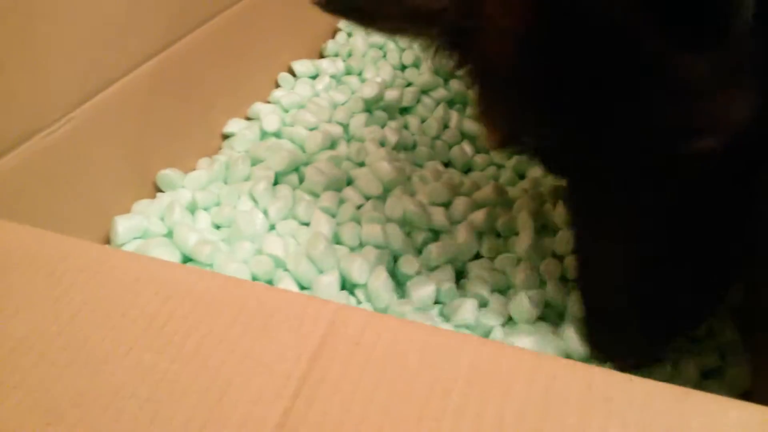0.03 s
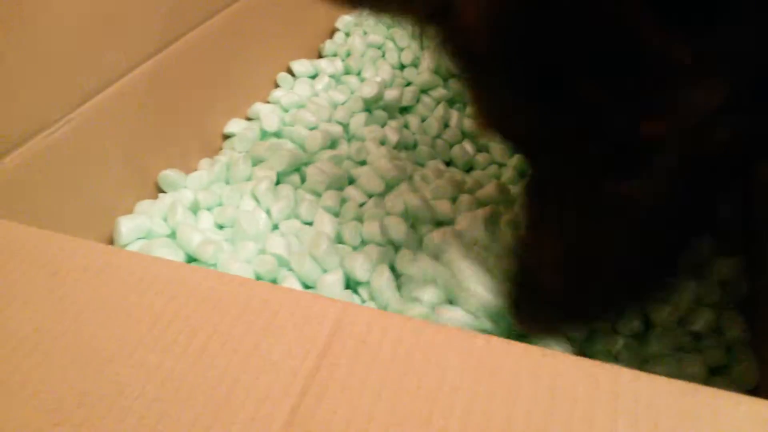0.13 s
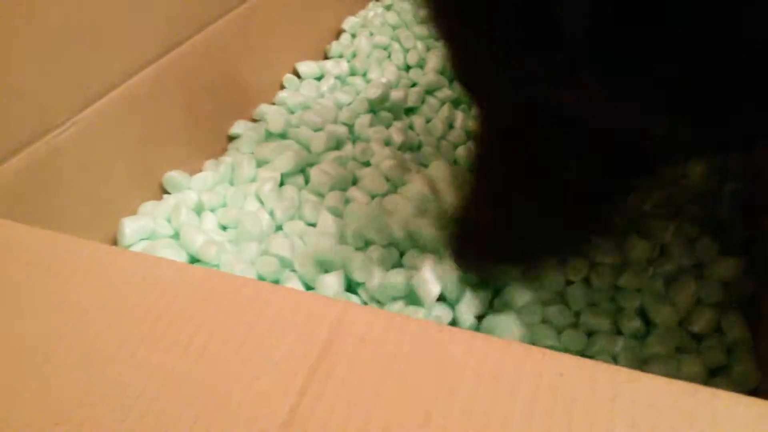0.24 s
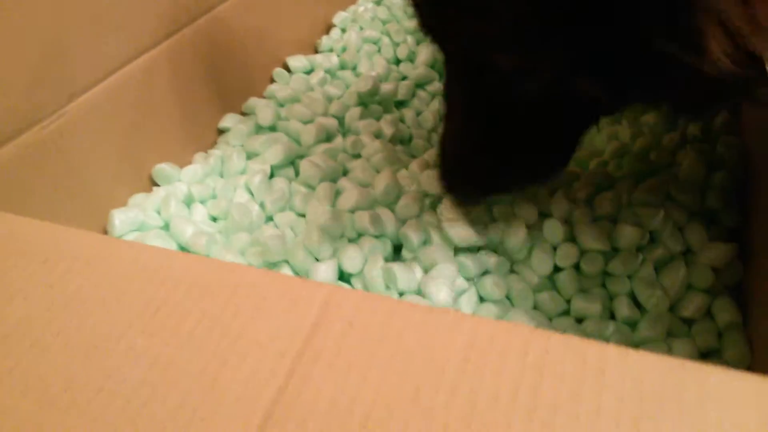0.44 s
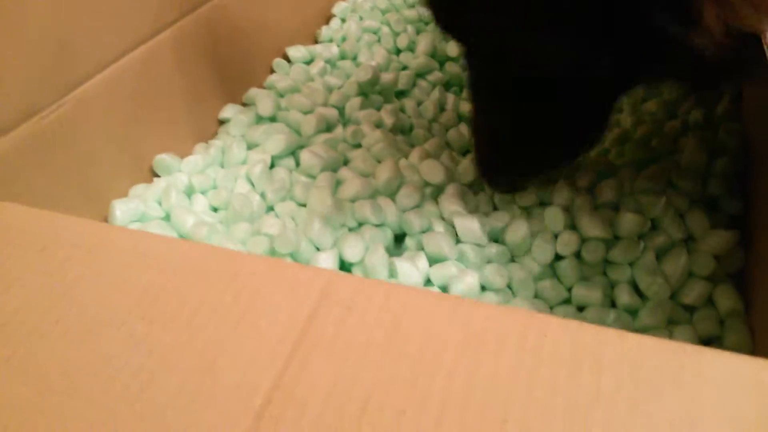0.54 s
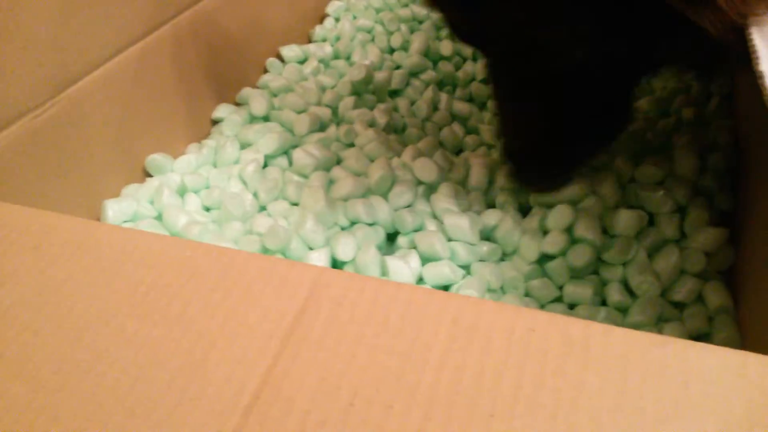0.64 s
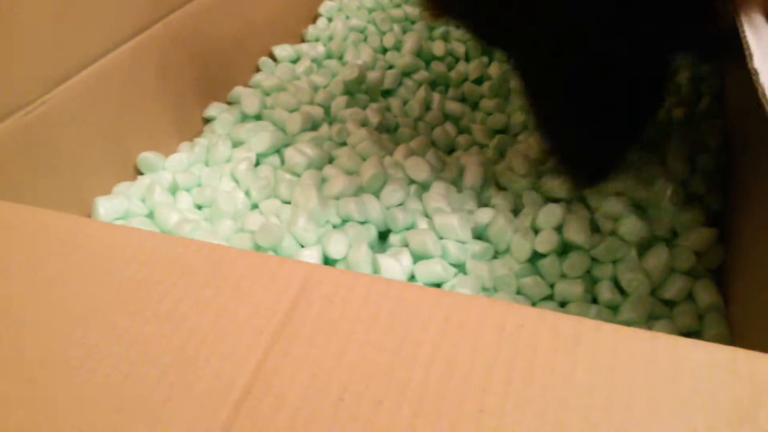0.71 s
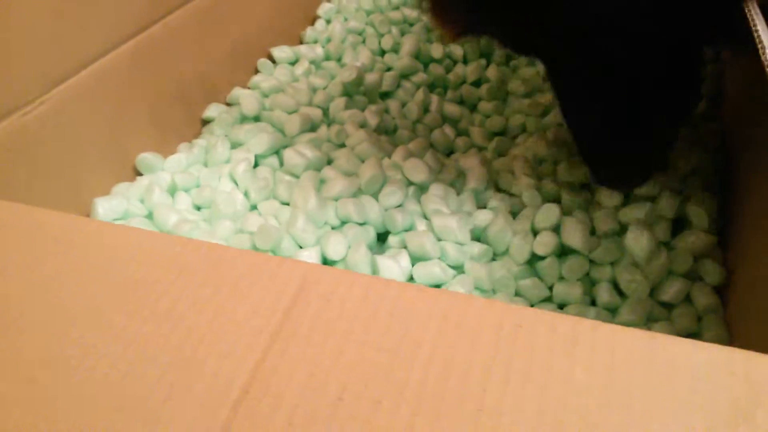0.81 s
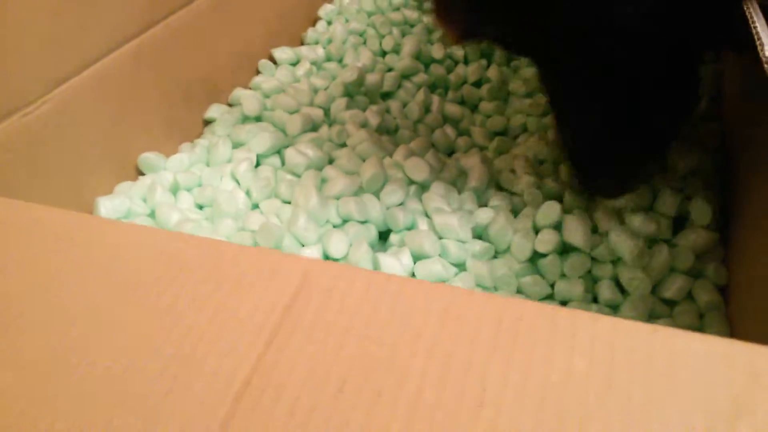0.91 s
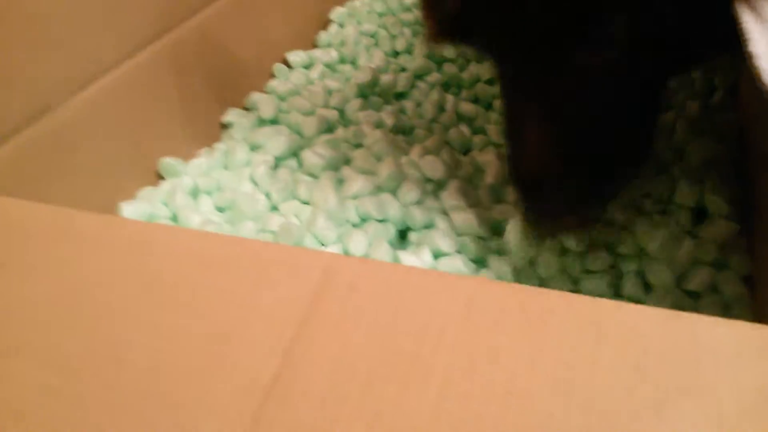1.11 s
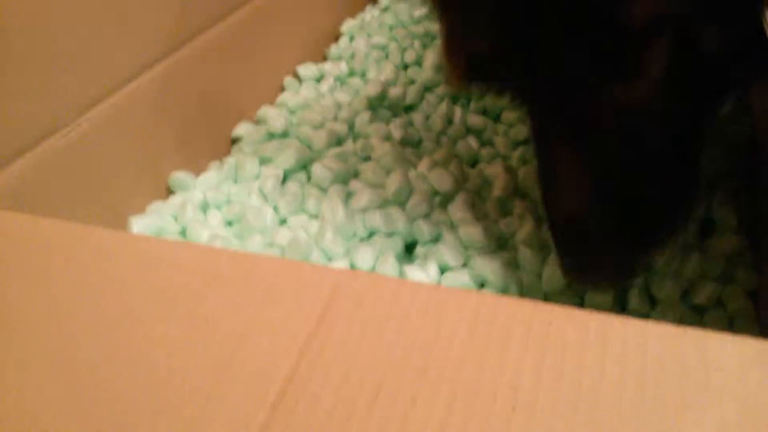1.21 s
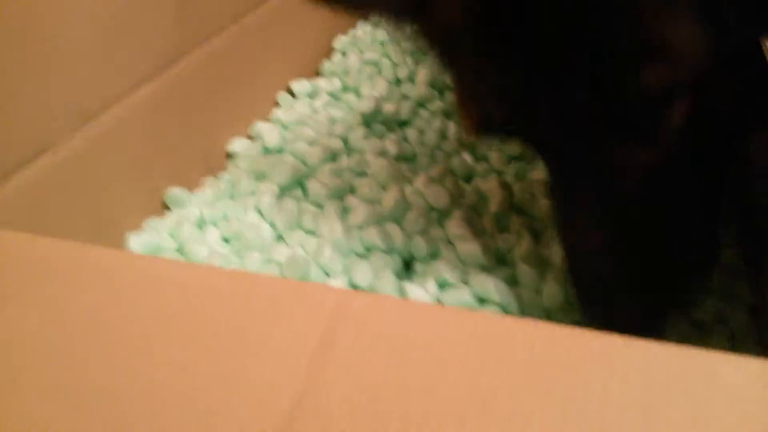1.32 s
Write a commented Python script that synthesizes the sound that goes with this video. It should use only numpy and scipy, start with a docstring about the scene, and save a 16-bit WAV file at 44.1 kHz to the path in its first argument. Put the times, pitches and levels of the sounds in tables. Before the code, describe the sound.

Packing peanuts rub and crackle lightly under a dog's nose, heard close to a big cardboard box in a small room. A quick cluster of knocks leaves a low boom, then come faint thin squeaks and one more bump.

```python
"""Dog in a box of packing peanuts

One microphone in a small room, on a big cardboard box. A dog pushes its muzzle through the
foam peanuts inside: they rub, tick and squeak thinly. A few dry knocks ring the cardboard,
and low room resonances swell and boom softly, mostly just after the knocks."""
import sys
import numpy as np
from scipy import signal
from scipy.fft import rfft, irfft
from scipy.io import wavfile

SR = 44100
rng = np.random.default_rng(int(sys.argv[2]) if len(sys.argv) > 2 else 0)


def wav_out(sig):
    """Save sig, one row per channel (or a flat mono array), as 16-bit PCM at SR to the path in sys.argv[1]."""
    wavfile.write(sys.argv[1], SR, np.round(np.clip(np.atleast_2d(sig).T, -1, 1) * 32767).astype(np.int16))


N = 59535
T = np.arange(N) / SR

# Room tone. Each row: frequency in Hz, relative level in dB.
AIR_SPECTRUM = [(15, -37), (25, -8), (59, 2), (194, 2), (388, -14.5), (1010, -8), (1680, -12.5),
                (5000, -23), (13000, -25.5), (14500, -28)]
# Low room resonances swelling. Each row: start in seconds, deepest mode's level in dB,
# upper modes' level in dB, their pitch ratio, their ring time (t60) in seconds.
LOW_BOOMS = [(0.272, -38, -64, 0.85, .4), (0.396, -22.5, -35, 0.98, 0.88), (.56, -28, -40, 0.61, 0.23),
             (.75, -36, -43, 0.93, 0.29), (1.17, -47, -35, .88, .25), (1.262, -57, -37.5, 0.88, 0.19)]
# Those upper modes. Each row: frequency in Hz, relative level in dB, share of the ring time.
ROOM_MODES = [(124.8, -9.5, 1), (198.1, 3, 0.93), (297.7, -3, 0.6), (373, -19, 0.45)]
# The whole load shifting. Each row: time in seconds, level in dB.
SHUFFLE_LEVELS = [(0, -68), (.07, -57), (.11, -43.5), (.15, -54.5), (.21, -45), (.3, -46), (.37, -38.5),
                  (.41, -35), (.47, -45.5), (.56, -49.5), (.7, -48), (.79, -47), (.95, -53), (1.1, -55.5),
                  (1.165, -45.5), (1.23, -51.5), (1.35, -59)]
# Its dull colour. Each row: frequency in Hz, relative level in dB.
SHUFFLE_SPECTRUM = [(25, -28), (38, -8), (55, 0.5), (78, -0.5), (100, -6), (135, -3.5), (250, -8),
                    (450, -8.5), (750, -12), (1200, -24), (3000, -47)]
# Knocks on the cardboard and the short room echoes after the loudest ones. Each row: start in
# seconds, level in dB, relative level of the scuff in dB, scuff decay in seconds, pitch ratio.
KNOCKS_AND_ECHOES = [(0.207, -36, -4, 0.0065, 1.1), (0.217, -30.5, -3.5, 0.0093, 1.05),
                     (0.232, -33, -18, 0.0052, 1), (.2445, -28, 0, 0.022, 1.05),
                     (0.2909, -25, 2.5, 0.0087, 1.01), (0.3243, -25.5, -4, .006, 0.98),
                     (0.3294, -30.5, 7.5, 0.018, 0.915), (0.365, -8.5, -5, 0.012, 1.05),
                     (0.3857, -31, 3.5, 0.016, 1.08), (0.427, -25.5, 1.5, 0.0053, 0.97),
                     (.938, -51.5, 8.5, 0.0055, 0.92), (1.011, -41, -6, 0.0084, 1.3),
                     (1.135, -21.5, -9.5, 0.0068, 0.86), (1.188, -39, 0.5, 0.015, 1.03),
                     (1.276, -46.5, 2.5, 0.0057, 0.97)]
# The cardboard's brief ring. Each row: frequency in Hz, relative level in dB, t60 in seconds.
CARDBOARD_MODES = [(920, -15.5, 0.014), (1145, -5.5, 0.0094), (1340, -8.5, 0.011), (1480, -9, 0.0071),
                   (1983, -4, 0.0083), (2425, -8, 0.0075), (2740, -12, 0.007)]
# Muzzle scraping cardboard. Each row: frequency in Hz, relative level in dB.
SCUFF_SPECTRUM = [(200, -28), (500, -14), (800, -4.5), (1200, 2.5), (1600, -5.5), (2050, -1), (2600, -10),
                  (3300, -20.5), (6000, -31), (12000, -54)]
# Reflections between the box walls. Each row: delay in seconds, gain in dB.
BOX_ECHOES = [(.0026, -8.5), (.0041, -14.5), (.0062, -15.5), (.0088, -15)]
# Foam squeaks. Each row: middle in seconds, half length in seconds, level in dB, pitch in Hz.
SQUEAKS = [(0.703, 0.016, -48, 13370), (0.868, 0.02, -50.5, 13460), (0.889, 0.0025, -49, 4550)]
# Single peanuts snapping. Each row: start in seconds, level in dB.
TICKS = [(0.207, -42), (.269, -32.5), (0.696, -33), (0.758, -48), (.764, -46), (.78, -44), (.822, -51),
         (0.8694, -29), (1.015, -50)]
# How hard the muzzle stirs the peanuts. Each row: time in seconds, level in dB.
STIR_LEVELS = [(0, -52), (.164, -51), (.184, -45.5), (.22, -40), (.23, -47.5), (.33, -46), (.39, -47),
               (.43, -53), (.55, -57.5), (.65, -53), (.698, -43.5), (.718, -49), (.756, -44), (.795, -50.5),
               (.82, -48.5), (.835, -53.5), (.855, -56), (.88, -51), (.906, -62), (1.05, -61.5),
               (1.12, -52), (1.18, -60.5), (1.35, -58.5)]
# Foam rubbing on foam. Each row: frequency in Hz, relative level in dB.
RUSTLE_SPECTRUM = [(150, -15), (300, -29), (450, -12), (750, -11), (1400, -7), (2100, -5), (3000, -6),
                   (4000, -1.5), (4700, -0.5), (6300, -6.5), (9000, -10), (14000, -15.5)]

AIR_DB, SHUFFLE_DB, SCUFF_DB = -53.5, -3.5, 15.5
BOOM_HZ, BOOM_T60_S, BOOM_RISE_S = 56.6, 0.32, 0.03
CONTACT_HZ = 3640  # a soft contact dulls the blow
CRUNCH_DB, CRUNCH_DELAY_S, CRUNCH_DECAY_S = -22, 0.0034, 0.0044
RUB_DB, JERK_DB = -2, 1.0
SLIP_DB, SLIP_SPREAD_DB, SLIPS_PER_S = -3, 2, 2200  # the rate holds at the rms stirring level
ROOM_T60_S, ROOM_DELAY_S, KNOCK_ROOM_DB, FOAM_ROOM_DB = 0.35, 0.015, -7, -12
LOW_CUT_HZ, HIGH_CUT_HZ = 26, 14600


def from_db(db):
    """Decibels to gain."""
    return 10 ** (np.asarray(db) / 20)


def unit_rms(x):
    """Scale to an rms of 1."""
    return x / np.sqrt(np.mean(x ** 2) + 1e-20)


def level(rows):
    """Gain over time from (seconds, dB) points."""
    return from_db(np.interp(T, *np.transpose(rows)))


def noise():
    """White noise for the length of the scene."""
    return rng.standard_normal(N)


def coloured(x, spectrum):
    """Filter by a curve of (Hz, dB) points, then scale to an rms of 1."""
    hz, db = np.transpose(spectrum)
    bin_hz = np.maximum(np.arange(N // 2 + 1) * SR / N, 1)
    gain = from_db(np.interp(np.log(bin_hz), np.log(hz), db))
    return unit_rms(irfft(rfft(x) * gain, N))


def band(x, low_hz, high_hz):
    """Gentle band-pass."""
    return signal.sosfilt(signal.butter(2, [low_hz, high_hz], "band", fs=SR, output="sos"), x)


def ring(x, hz, t60):
    """One mode: a unit click sets off a dying sine of height 1."""
    radius, angle = np.exp(-np.log(1000) / (t60 * SR)), 2 * np.pi * hz / SR
    return signal.lfilter([0, np.sin(angle)], [1, -2 * radius * np.cos(angle), radius ** 2], x + 1e-18)


def dying(start, decay_s):
    """Envelope that jumps to 1 and falls away."""
    return (T >= start) * np.exp(-np.maximum(T - start, 0) / decay_s)


def swell(start, hz, t60):
    """A low mode builds up, then dies."""
    age = np.maximum(T - start, 0)
    rise = 1 - np.exp(-age / BOOM_RISE_S)
    return np.sin(2 * np.pi * hz * age) * rise * dying(start, t60 / np.log(1000))


def room_tone():
    """The steady air of the room, mostly low rumble."""
    return from_db(AIR_DB) * coloured(noise(), AIR_SPECTRUM)


def room_reverb(x):
    """The room's diffuse tail reaches the microphone just after the direct sound."""
    tail = noise() * dying(ROOM_DELAY_S, ROOM_T60_S / np.log(1000))
    return signal.fftconvolve(x, tail / np.linalg.norm(tail))[:N]


def room_booms():
    """Low room resonances swell and boom softly, mostly just after knocks."""
    booms = np.zeros(N)
    for start, boom_db, upper_db, ratio, t60 in LOW_BOOMS:
        booms += from_db(boom_db) * swell(start, BOOM_HZ, BOOM_T60_S)
        for hz, mode_db, share in ROOM_MODES:
            booms += from_db(upper_db + mode_db) * swell(start, hz * ratio, t60 * share)
    return booms


def load_shuffle():
    """The whole load of peanuts shifts with a dull noise."""
    return from_db(SHUFFLE_DB) * level(SHUFFLE_LEVELS) * coloured(noise(), SHUFFLE_SPECTRUM)


def cardboard_knocks():
    """Knocks and their short room echoes: ringing card, a scrape, crushed foam, box reflections."""
    ringing, scuff_envelope, crunch_envelope = np.zeros((3, N))
    for start, db, scuff_db, scuff_s, ratio in KNOCKS_AND_ECHOES:
        click = from_db(db) * (np.arange(N) == int(start * SR))
        for k, (hz, mode_db, t60) in enumerate(CARDBOARD_MODES):
            ringing += (-1) ** k * from_db(mode_db) * ring(click, hz * ratio, t60)
        scrape = dying(start, scuff_s) / np.sqrt(scuff_s * SR / 2)  # unit energy at any length
        scuff_envelope += from_db(db + scuff_db) * scrape
        crunch_envelope += from_db(db + CRUNCH_DB) * dying(start + CRUNCH_DELAY_S, CRUNCH_DECAY_S)
    dulled = signal.sosfilt(signal.butter(2, CONTACT_HZ, fs=SR, output="sos"), ringing)
    scuff = from_db(SCUFF_DB) * scuff_envelope * coloured(noise(), SCUFF_SPECTRUM)
    crunch = crunch_envelope * unit_rms(band(noise(), low_hz=2360, high_hz=4340))
    knocks = dulled + scuff + crunch
    echoes = sum(from_db(db) * np.interp(T - delay, T, knocks, left=0) for delay, db in BOX_ECHOES)
    return knocks + echoes


def peanut_squeaks(half_width_hz=54):
    """The foam squeaks in thin, wavering tones that swell and fade."""
    squeaks = np.zeros(N)
    for middle, half_length, db, hz in SQUEAKS:
        narrow_noise = band(noise(), hz - half_width_hz, hz + half_width_hz)
        phase = np.angle(signal.hilbert(narrow_noise))
        envelope = np.exp(-0.5 * ((T - middle) / half_length) ** 2)
        squeaks += from_db(db) * envelope * np.cos(phase)
    return squeaks


def peanut_ticks():
    """Single peanuts snap past each other, short and bright."""
    envelope = sum(from_db(db) * dying(start, decay_s=0.0011) for start, db in TICKS)
    return band(envelope * noise(), low_hz=3640, high_hz=10200)


def peanut_rustle():
    """Smooth rubbing and tiny slips, in small jerks; harder stirring makes more slips."""
    jerks = unit_rms(band(noise(), low_hz=13, high_hz=83.33))
    stir = level(STIR_LEVELS) * from_db(JERK_DB * jerks)
    slipping = rng.random(N) < SLIPS_PER_S * np.sqrt(unit_rms(stir)) / SR
    sizes = from_db(SLIP_SPREAD_DB * np.minimum(rng.exponential(1, N), 4))
    signs = rng.choice([-1, 1], N)
    slips = from_db(SLIP_DB) * coloured(slipping * sizes * signs, RUSTLE_SPECTRUM)
    rubbing = from_db(RUB_DB) * coloured(noise(), RUSTLE_SPECTRUM)
    return stir * (rubbing + slips)


def scene():
    """Box and room at one microphone; only foam and knocks feed the reverb."""
    foam = peanut_rustle() + peanut_ticks() + peanut_squeaks()
    knocks = cardboard_knocks()
    background = load_shuffle() + room_tone()
    reverb = room_reverb(from_db(KNOCK_ROOM_DB) * knocks + from_db(FOAM_ROOM_DB) * foam)
    return (background + reverb + room_booms() + knocks + foam)[None]


def record(dry):
    """The microphone chain loses the deepest bass and cuts the top steeply."""
    low_cut = signal.butter(4, LOW_CUT_HZ, "high", fs=SR, output="sos")
    high_cut = signal.ellip(12, 0.1, 80, HIGH_CUT_HZ, fs=SR, output="sos")
    return signal.sosfilt(high_cut, signal.sosfilt(low_cut, dry))


dry = scene()
out = record(dry)
wav_out(out)
```